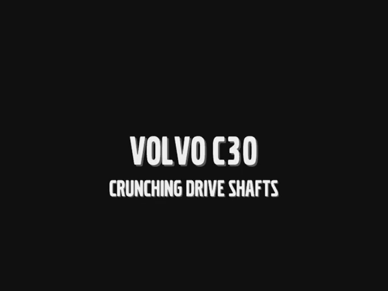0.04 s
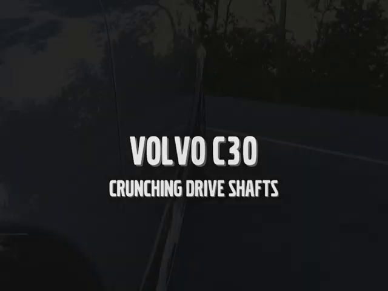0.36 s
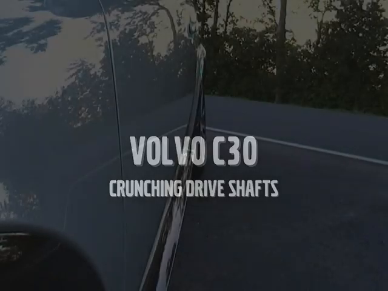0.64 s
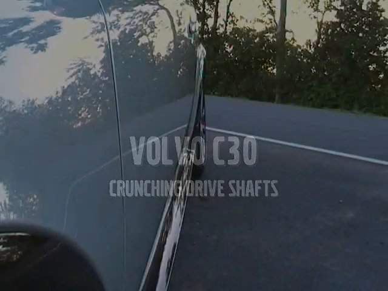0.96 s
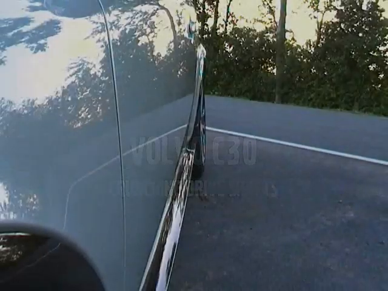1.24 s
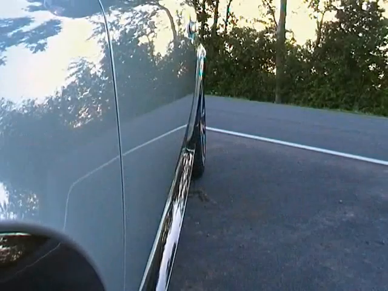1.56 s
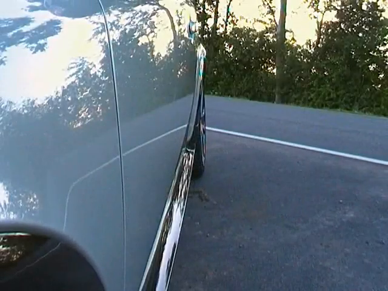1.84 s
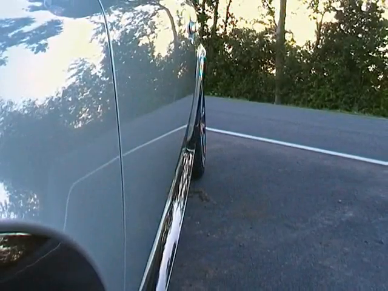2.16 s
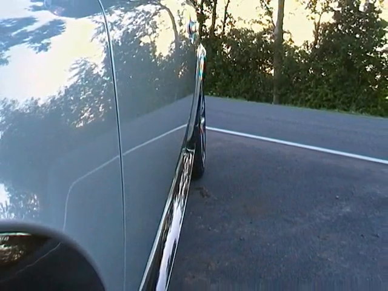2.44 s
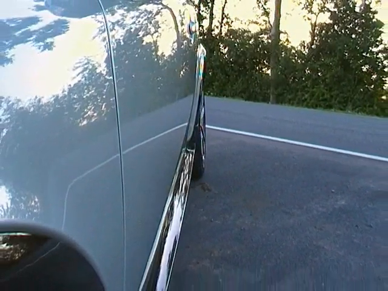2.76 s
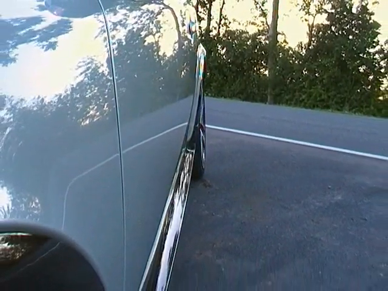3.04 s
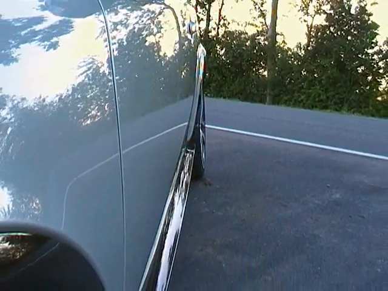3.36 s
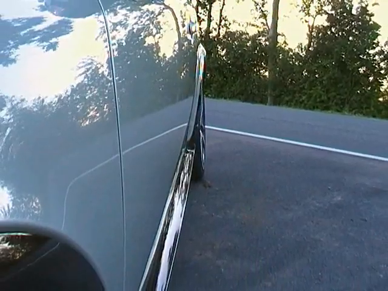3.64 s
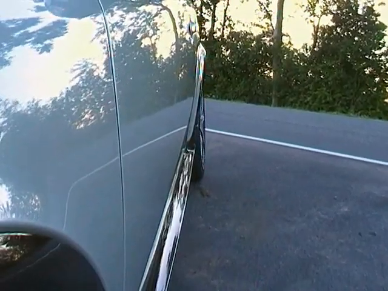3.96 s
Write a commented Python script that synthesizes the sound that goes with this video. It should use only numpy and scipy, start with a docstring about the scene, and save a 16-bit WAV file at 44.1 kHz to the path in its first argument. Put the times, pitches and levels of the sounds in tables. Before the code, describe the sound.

A car engine idles, then revs and pulls away with sharp metallic drive shaft cracks.

```python
"""A car idles on asphalt, heard from beside its door, then revs and pulls away.
The engine ticks and whirrs through fixed bay resonances, its belt drive whines, and the exhaust drones
as it speeds up. A worn drive shaft joint binds and lets go in sharp metallic cracks.
Dull knocks and a few soft scuffs come before the move."""
import sys
import numpy as np
from scipy import signal
from scipy.fft import rfft, irfft
from scipy.io import wavfile

SR = 44100
rng = np.random.default_rng(int(sys.argv[2]) if len(sys.argv) > 2 else 0)


def waveform_to_disk(signal):
    """Save audio, clipped to [-1, 1], as 16-bit WAV at the path in sys.argv[1]."""
    frames = np.transpose(np.atleast_2d(signal))
    scaled = np.clip(frames, -1, 1) * 32767
    samples = np.round(scaled).astype(np.int16)
    wavfile.write(sys.argv[1], SR, samples)


N = 176400
TOP_HZ = 11650
RING_S = .02  # crack and knock levels are rms over this time
# engine speed (time [s], firing rate [Hz])
FIRING_HZ = [(0, 26.9), (2.6, 27), (2.72, 29), (2.82, 31.8), (2.906, 35.7), (3.046, 43.3), (3.202, 53.3),
             (3.456, 64.2), (3.604, 70.2), (3.746, 74), (3.898, 76.1), (4.0, 76.7)]
# engine load (time [s], drone [dB], roar [dB])
LOAD_DB = [(0, -55, -43.5), (2.6, -52.5, -43), (2.82, -47.5, -37.5), (3.03, -35, -32.5), (3.2, -36, -30.5),
           (3.47, -34.5, -27.5), (3.65, -31.5, -27), (4.0, -30.5, -26.5)]


def engine(firings):
    """Whirr and roar throb with the firings while the valves tick, all through the bay resonances."""
    # idle whirr spectrum (frequency [Hz], density [dB])
    idle_spectrum = [(15, -35), (25, 2), (75, -13), (132, -1.5), (210, -5), (317, -4), (360, -7), (454, -3),
                     (587, -3), (684, -1.5), (1200, -5), (1680, -0.5), (2120, -4), (2660, -10.5),
                     (2950, -10), (5330, -16), (11500, -34.5), (15000, -115), (22000, -120)]
    # roar spectrum under load (frequency [Hz], density [dB])
    roar_spectrum = [(15, -38), (25, -34), (60, -5.5), (265, -3), (454, -6.5), (529, -2), (617, 2.5),
                     (840, -3), (1370, -4), (1550, -7.5), (2120, -1.5), (2400, -6.5), (4120, -9),
                     (7060, -18.5), (9370, -20), (11500, -30.5), (15000, -86), (22000, -120)]
    # engine bay resonances (frequency [Hz], width [Hz], lift [dB])
    bay_modes = [(295.3, 42, 6.5), (460, 29, 5.5), (730, 110, 3), (912, 55, 3.5), (1207, 48, -6.5),
                 (1410, 160, 2.5), (1770, 32, -0.5), (1990, 28, 3.5), (2081, 39, 6.5), (2960, 63, 0),
                 (3050, 67, -1), (4260, 2200, 0)]
    idle_db, flicker_db, roar_low_hz = -36.5, .5, 110
    tick_db, tick_s, tick_scatter_db = -13, .0032, -.5
    throb = 1 + .033 * np.cos(2 * np.pi * firings) + .024 * np.cos(np.pi * firings)
    valve = 2 * firings  # two ticks per firing
    sizes = undb(tick_scatter_db * rng.standard_normal(1000))[valve.astype(int)]
    since_tick_s = (valve % 1) / (2 * curve(FIRING_HZ))
    ticks = unit(sizes * np.exp(-since_tick_s / tick_s) * noise())
    bay_db = resonance_db(bins(), bay_modes)
    idle = undb(across(idle_spectrum) + bay_db)
    roar = undb(across(roar_spectrum) + bay_db) * bins() / np.hypot(bins(), roar_low_hz)
    out = 0
    for gain, db in ((idle, idle_db), (roar, curve(LOAD_DB, column=2))):
        drive = (noise() * throb + undb(tick_db) * ticks) * undb(flicker_db * walk(hz=32))
        out = out + undb(db) * colour(drive, gain)
    return out


def drone(firings):
    """Firing harmonics climb with speed and boom as they cross the exhaust and body resonances."""
    # harmonics (multiple of firing rate, level [dB])
    orders = [(1, 0), (2, 1), (3, 0), (4, -3), (5, -.5), (6, 1.5), (7, -6), (8, 1.5), (8.5, -2), (10, -.5)]
    # exhaust and body resonances (frequency [Hz], width [Hz], lift [dB])
    boom_modes = [(73, 45, 3.3), (276, 31, 9), (470, 20, 7.4)]
    rate_hz, tones = curve(FIRING_HZ), 0
    for order, db in orders:
        boom_db = resonance_db(order * rate_hz, boom_modes)
        effort_db = -9 * (order > 3) * (1 - rate_hz / rate_hz.max())  # upper orders sink at low revs
        wander_db = -.75 * min(order, 3) * walk(hz=7.2)
        tone = np.sin(2 * np.pi * (order * firings + rng.random()))
        tones = tones + undb(db + boom_db + effort_db + wander_db) * tone
    return undb(curve(LOAD_DB)) * unit(tones)


def drive_shaft():
    """Each crack is a quick run of slips that rings bodywork, shaft, joint and balls."""
    # joint cracks (time [s], bodywork [dB], shaft [dB], joint [dB], balls [dB], slip length [s])
    cracks = [(3.081, -38, -35.5, -30.5, -35.5, .0045), (3.1805, -40, -34.5, -29, -33, .004),
              (3.2705, -42, -35, -29, -33, .0015), (3.326, -29.5, -34, -32, -32, .002),
              (3.363, -16.8, -28.5, -30.5, -31.5, .005), (3.4615, -19.8, -19.5, -27.5, -31, .006),
              (3.602, -34, -26, -26.5, -34, .0045), (3.934, -24.5, -26.5, -25, -32, .0055)]
    # modes by part (frequency [Hz], level [dB], t60 [s])
    part_modes = dict( bodywork=[(375, -8, .09), (452, -4, .15), (584, -4.5, .18), (975, -2.5, .16),
                  (1092, 3, .08), (1385, -4, .09), (1700, -7, .07), (1875, -8, .1)], shaft=[(2515, 14, .05),
                  (2985, 13, .09), (3070, 14, .05), (3630, 7.5, .052)], joint=[(4260, -5, .029),
                  (4610, 0, .036), (4740, -2, .028)], balls=[(8720, -3, .032), (8930, -6, .02),
                  (9450, -3, .018), (9640, 0, .026), (10300, -7, .012)])
    # dense rattle by part (low [Hz], high [Hz], level [dB], t60 [s])
    rattles = [(280, 1900, -6, .07), (2300, 3700, -13, .06), (4000, 4900, -12, .035),
               (5400, 12000, -8, .045)]
    detune = .003
    t = np.arange(SR // 4) / SR
    out = np.zeros(N + len(t))
    for start_s, *part_db, slip_s in cracks:
        at = int(start_s * SR)
        for db, modes, (low_hz, high_hz, rattle_db, t60_s) in zip(part_db, part_modes.values(), rattles):
            slips = rng.standard_normal(len(t)) * np.exp(-(t / slip_s) ** 4)
            ring = 0
            for hz, mode_db, mode_t60_s in modes:
                detuned_hz = hz * (1 + detune * rng.standard_normal())
                ring = ring + undb(mode_db) * struck(slips, detuned_hz, mode_t60_s)
            band = signal.butter(3, [low_hz, high_hz], "band", fs=SR, output="sos")
            envelope = fade(np.maximum(t - slip_s / 2, 0), t60_s)
            rattle = signal.sosfilt(band, rng.standard_normal(len(t)) * envelope)
            hit = unit(unit(ring) + undb(rattle_db) * unit(rattle))
            out[at:at + len(t)] += undb(db) * hit * np.sqrt(RING_S / t[-1])
    return out[:N]


def knocks():
    """Padded blows from inside the car ring the panel modes near their own register."""
    # blows (time [s], level [dB], centre [Hz], half contact time [s])
    blows = [(1.241, -40.5, 85, .004), (2.111, -26, 410, 0.0072), (2.497, -31, 280, 0.0034)]
    # panel modes (frequency [Hz], level [dB], t60 [s])
    panel_modes = [(83.4, 4, .15), (239, -2, 0.066), (309, 1.5, .1), (453, -0.5, 0.043), (660, 2, 0.049),
                   (930, 5, 0.045)]
    reach_octaves = .79
    t = np.arange(SR // 4) / SR
    out = np.zeros(N + len(t))
    for start_s, db, centre_hz, contact_s in blows:
        push = rng.standard_normal(len(t)) * np.exp(-(t / contact_s - 1) ** 2)
        ring = 0
        for hz, mode_db, t60_s in panel_modes:
            gain = undb(mode_db) / (1 + (np.log2(hz / centre_hz) / reach_octaves) ** 4)
            ring = ring + gain * struck(push, hz, t60_s)
        at = int(start_s * SR)
        out[at:at + len(t)] += undb(db) * unit(ring) * np.sqrt(RING_S / t[-1])
    return out[:N]


def scuffs():
    """Brief rubs near the microphone, each a soft body plus crisp hiss."""
    # rubs (peak time [s], body [dB], hiss [dB], Gaussian sigma [s])
    rubs = [(0.585, -33.5, -62, 0.0064), (0.659, -30.5, -60, 0.007), (0.699, -34.5, -74, 0.012),
            (1.25, -34, -47.5, 0.013), (1.607, -33.5, -74, 0.03), (2.75, -42, -62, 0.015)]
    # rub body spectrum (frequency [Hz], density [dB])
    body_spectrum = [(100, -37), (500, 8), (1400, 6), (2600, 4), (4300, -4.5), (6500, -21), (12000, -51)]
    hiss_low_hz = 4970
    body = colour(noise(), undb(across(body_spectrum)))
    hiss = colour(noise(), (bins() < TOP_HZ) / (1 + (hiss_low_hz / bins()) ** 4))
    out = 0
    for peak_s, body_db, hiss_db, sigma_s in rubs:
        envelope = np.exp(-((clock() - peak_s) / sigma_s) ** 2 / 2)
        out = out + (undb(body_db) * body + undb(hiss_db) * hiss) * envelope
    return out


def pulleys():
    """The belt drive whines in narrow, wavering noise bands."""
    # belt and pulley whines (frequency [Hz], relative level [dB])
    whines = [(306.8, -65), (629.8, -57.5), (963.6, -50), (1378, -48), (1653, -48.5), (1879, -47),
              (2067, -47.5), (2385, -90), (3047, -55.5)]
    gain_db, half_width_hz = -2.5, 12.3
    return sum(undb(db + gain_db) * colour(noise(), np.exp(-((bins() - hz) / half_width_hz) ** 2))
               for hz, db in whines)


def reflected(x, t60_s):
    """Dense reflections between road and car body, at the level of the source."""
    t = np.arange(SR // 4) / SR
    response = unit(rng.standard_normal(len(t)) * fade(t, t60_s)) / np.sqrt(len(t))
    return signal.fftconvolve(x, response)[:N]


def ports(direct, scattered):
    """The left microphone port hears the car first; scattered sound, mostly treble, differs by side."""
    # port pair (frequency [Hz], left lead [rad], left minus right [dB], scattered [dB])
    pair = [(30, 0, 1, -13), (70, 0, .6, -18), (400, .06, -.3, -20), (1200, .22, -.2, -16),
            (2800, .48, -1.4, -11), (4500, 1.15, -2, -10), (6500, 2.0, -1.4, -5), (9500, 1.9, 2, -3),
            (12000, 1.8, 2.5, -3)]
    lead_rad, balance_db, scattered_db = (across(pair, column) for column in (1, 2, 3))
    side = np.array([[1], [-1]])
    arrival = np.exp(side * 1j * lead_rad / 2) * undb(side * balance_db / 2)
    return irfft(arrival * (rfft(direct) + side * undb(scattered_db) * rfft(scattered)), N)


def struck(push, hz, t60_s):
    """One mode rung by a push, rms 1; builds up over its first cycle."""
    t = np.arange(len(push)) / SR
    mode = np.sin(2 * np.pi * hz * t) * (1 - np.exp(-hz * t)) * fade(t, t60_s)
    return unit(signal.fftconvolve(push, mode)[:len(t)])


def resonance_db(hz, modes):
    """Summed lift of bell-shaped resonances at hz."""
    return sum(db / (1 + (2 * (hz - centre_hz) / width_hz) ** 2) for centre_hz, width_hz, db in modes)


def undb(db):
    """Decibels to gain."""
    return 10 ** (np.asarray(db) / 20)


def unit(x):
    """Scale to rms 1."""
    return x / np.sqrt(np.mean(x ** 2) + 1e-20)


def clock():
    """Sample times [s]."""
    return np.arange(N) / SR


def bins():
    """Bin frequencies [Hz]."""
    return np.maximum(np.arange(N // 2 + 1) * SR / N, 1)


def curve(table, column=1):
    """Table column interpolated in time."""
    rows = np.array(table)
    return np.interp(clock(), rows[:, 0], rows[:, column])


def across(table, column=1):
    """Table column interpolated in log frequency."""
    rows = np.array(table)
    return np.interp(np.log(bins()), np.log(rows[:, 0]), rows[:, column])


def colour(x, gain):
    """Filter by a gain per bin, to rms 1."""
    return unit(irfft(rfft(x) * gain, N))


def noise():
    """White noise."""
    return rng.standard_normal(N)


def walk(hz):
    """Slow random wander, rms 1."""
    return colour(noise(), np.exp(-(bins() / hz) ** 2))


def fade(t, t60_s):
    """Exponential decay."""
    return np.exp(-np.log(1000) * t / t60_s)


def scene():
    """The car at the microphone, in stereo."""
    speed_jitter, echo_db = .0027, -14
    firings = np.cumsum(curve(FIRING_HZ) * (1 + speed_jitter * walk(hz=11))) / SR
    cracks = drive_shaft()
    direct = engine(firings) + drone(firings) + pulleys() + knocks() + scuffs() + cracks
    direct += undb(echo_db) * reflected(cracks, t60_s=.1)
    return ports(direct, scattered=engine(firings) + drive_shaft())


def record(dry):
    """The sound cuts in and is low-passed at TOP_HZ."""
    start_s, rise_s = .376, .002
    gate = np.clip((clock() - start_s) / rise_s, 0, 1)
    return signal.sosfilt(signal.ellip(8, .2, 80, TOP_HZ, fs=SR, output="sos"), dry * gate)


dry = scene()
out = record(dry)
waveform_to_disk(out)
```